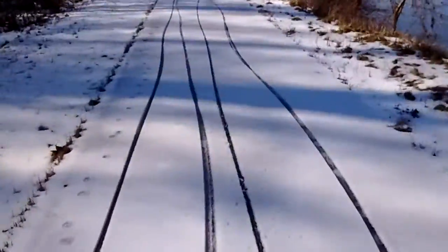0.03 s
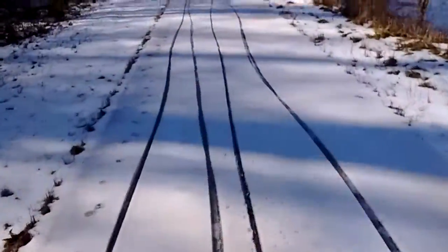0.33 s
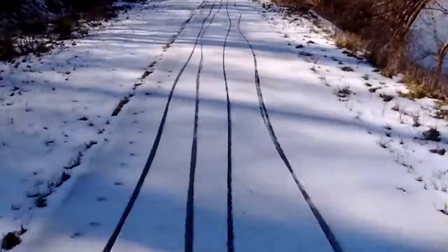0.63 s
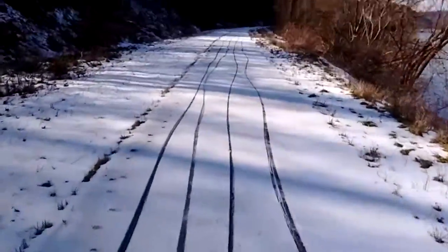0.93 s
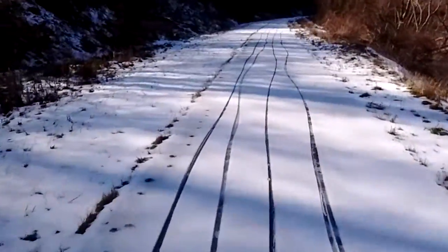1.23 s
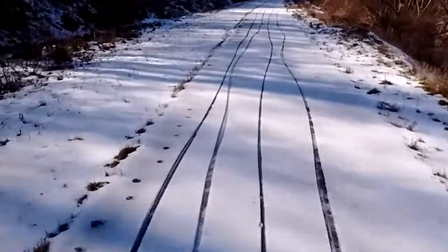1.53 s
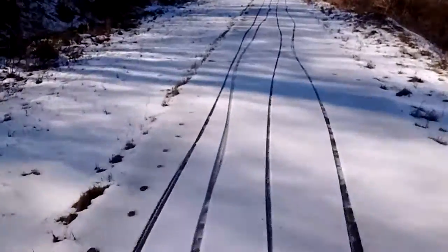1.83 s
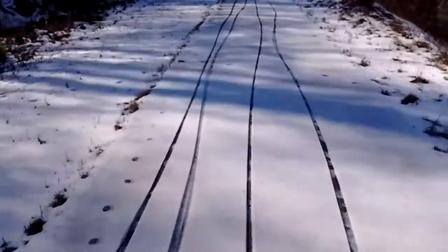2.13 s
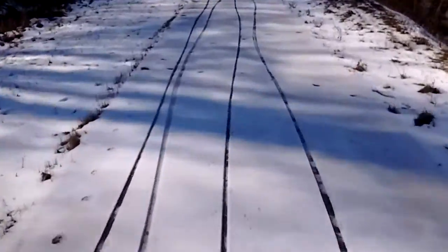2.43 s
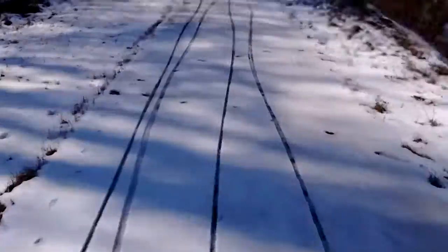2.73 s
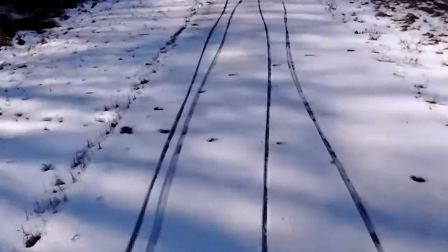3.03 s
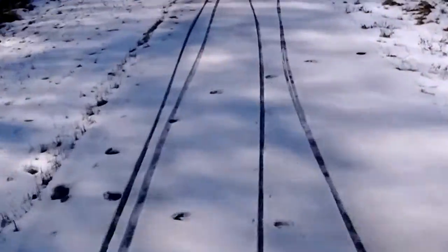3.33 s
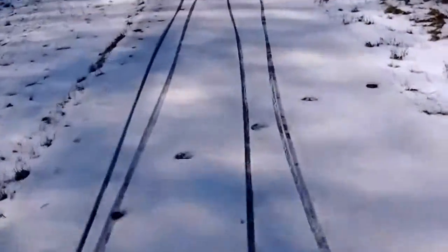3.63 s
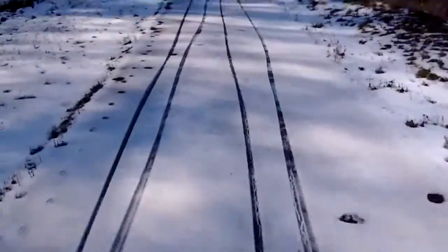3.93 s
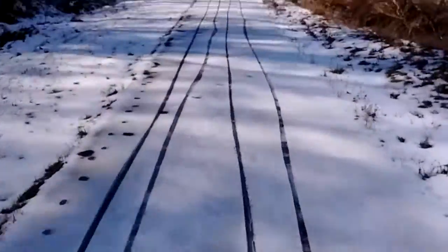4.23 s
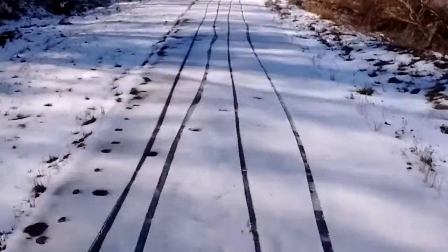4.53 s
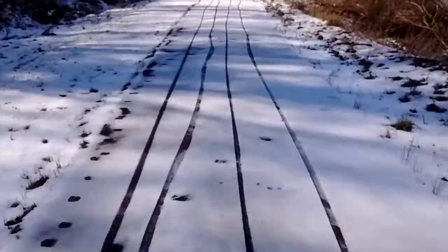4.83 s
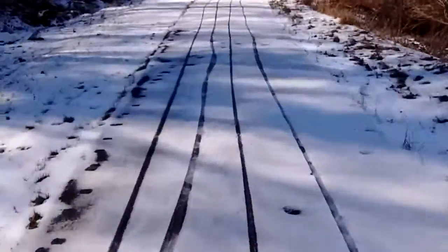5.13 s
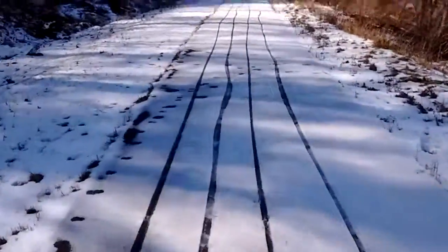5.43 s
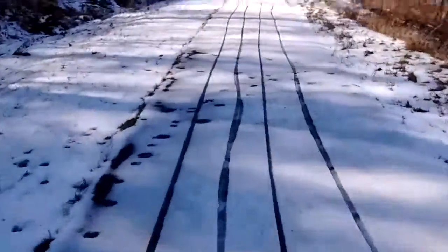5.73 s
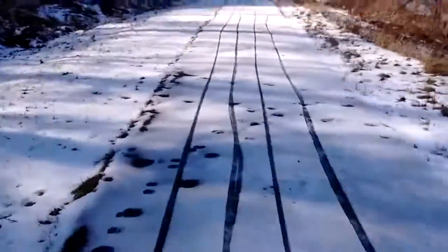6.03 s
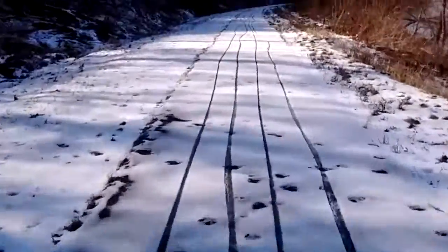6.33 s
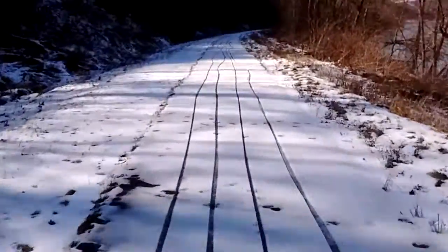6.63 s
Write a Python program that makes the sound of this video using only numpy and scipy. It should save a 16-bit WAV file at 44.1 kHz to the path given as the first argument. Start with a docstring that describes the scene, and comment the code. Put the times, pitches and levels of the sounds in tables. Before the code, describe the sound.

Bicycle tyres crunch steadily over thin, crusted snow, with small icy cracks, light rattles and low wind rumbling on the microphone.

```python
"""On a trail of thin, crusted snow, a bicycle rolls along with a camera fixed to it.
The tyres crush a steady stream of grains, break clumps and crack ice, most of all over a trodden
patch near the end. Each break is a tiny click, shaped by the snow or by the part it sets ringing.
The frame booms under the jolts, a loose part rattles, the tread hums,
and wind buffets the camera's two microphone openings (the ports)."""
import sys
import numpy as np
from scipy import signal
from scipy.fft import rfft, irfft
from scipy.io import wavfile

SR = 44100
rng = np.random.default_rng(int(sys.argv[2]) if len(sys.argv) > 2 else 0)


def digitize_waveform(pressure):
    """Quantize a signal to 16-bit integers and store it at the path in sys.argv[1].

    Rows of a 2-D input are taken as channels; values are limited to [-1, 1].
    """
    field = np.atleast_2d(pressure).T
    bounded = np.clip(field, -1, 1)
    quanta = np.round(bounded * 32767).astype(np.int16)
    wavfile.write(sys.argv[1], SR, quanta)


N = 299880
TIME = np.arange(N) / SR

# how loud the snow is along the trail: (time [s], crunch [dB], powder fizz [dB])
SNOW_LEVELS = [(0, -33.5, -52.5), (.25, -32.5, -50.5), (.49, -30, -43), (.62, -31.5, -45.5),
               (.88, -27.5, -42.5), (1.1, -30, -48), (1.4, -29.5, -45), (1.9, -27.5, -41),
               (2.35, -29.5, -41), (2.72, -28.5, -44), (3.0, -29, -47.5), (3.4, -28, -46.5),
               (4.15, -29, -43.5), (4.33, -31.5, -52.5), (4.8, -29, -43), (5.35, -29.5, -41),
               (5.65, -32.5, -45), (5.95, -25.5, -39.5), (6.4, -29.5, -45), (6.8, -25, -39.5)]
# the tone of crunching snow and of fizzing powder: (frequency [Hz], level [dB])
CRUNCH_TONE = [(150, -21), (400, 5.5), (530, 4), (660, -1), (860, 2), (1270, -6.5), (1500, -2), (2000, -2),
               (2450, -1), (3000, -4.5), (4000, -13), (5000, -19), (6200, -27.5), (12000, -45.5)]
FIZZ_TONE = [(2000, -11.5), (4500, 7.5), (6300, -3), (7300, 1), (8400, 2.5), (9500, 1), (11500, -4),
             (15000, -11)]
# the notes of the frame, damped by the tyres, and the loose part: (pitch [Hz], width [Hz], level [dB])
FRAME_NOTES = [(114.7, 14, -5.5), (223.3, 23, -3.5), (256, 46, 1.5), (327, 30, -6), (514.4, 36.5, -4.5)]
LOOSE_PART_NOTES = [(1360, 340, -25.5), (1890, 190, -17), (2040, 150, -9)]


def rolling():
    """Snow gives way unevenly, shaking frame and loose part in step; powder sprays in its own waves."""
    pressure_db = follow(SNOW_LEVELS, 1) + 1.5 * flutter(slow_hz=0.75, fast_hz=55)
    powder_db = follow(SNOW_LEVELS, 2) + 2 * flutter(slow_hz=2, fast_hz=23.8)
    crunch = colour(grains(per_s=9000, spread_db=2.5) * amp(pressure_db - 3.5), CRUNCH_TONE)
    fizz = colour(grains(per_s=20000, spread_db=-0.5) * amp(powder_db - 3.5), FIZZ_TONE)
    jolts = grains(per_s=2500, spread_db=1)
    sway_db = 3 * flutter(slow_hz=0.77, fast_hz=5.6)
    boom = ring(jolts * amp(pressure_db - 5 + sway_db), FRAME_NOTES)
    buzz = ring(grains(per_s=3000, spread_db=1) * amp(pressure_db - 16.5), LOOSE_PART_NOTES)
    return crunch + fizz + boom + buzz


# big clumps of snow under a tyre: (time [s], crunch [dB], length [s], thud [dB])
BIG_CLUMPS = [(.497, -30, 0.014, -47), (.766, -28.5, 0.01, -34), (.792, -25, 0.0086, -22),
              (1.016, -33, 0.011, -20), (1.395, -31, 0.028, -38), (1.552, -28.5, 0.012, -32),
              (2.026, -25.5, 0.0071, -41), (2.322, -27, 0.018, -29), (2.396, -28, 0.023, -35),
              (2.45, -29, 0.01, -29), (2.484, -26.5, 0.02, -40), (2.556, -29, 0.01, -30),
              (2.588, -28.5, 0.005, -21), (2.821, -28, 0.0098, -34), (2.89, -27.5, 0.0055, -22),
              (3.293, -28, 0.009, -43), (3.344, -22.5, 0.0037, -47), (3.469, -26.5, 0.0052, -22),
              (3.542, -30.5, .007, -36), (3.582, -27.5, 0.016, -29), (3.903, -24.5, 0.0078, -23),
              (3.922, -23.5, 0.0065, -31), (3.96, -24.5, 0.012, -29), (4.138, -29, 0.0039, -20.5),
              (4.348, -25, 0.0068, -28), (4.479, -29.5, 0.012, -23.5), (4.578, -26, 0.0052, -23.5),
              (4.762, -25, .0038, -37), (4.811, -28, 0.0078, -39), (4.845, -30, 0.027, -31),
              (5.476, -23.5, 0.01, -22), (5.508, -22.5, 0.0044, -23), (5.519, -25, 0.016, -27),
              (5.535, -18.5, 0.0072, -38), (5.582, -28, 0.0057, -31), (5.615, -32, .003, -36),
              (5.648, -23.5, 0.0067, -31), (5.696, -26, 0.0041, -29), (5.731, -24.5, 0.0093, -22.5),
              (5.752, -28, 0.011, -23), (5.797, -22, 0.0083, -38), (5.815, -18, 0.011, -15),
              (5.853, -21, 0.0093, -36), (5.876, -29, 0.0031, -34), (5.95, -23, 0.0028, -29),
              (5.959, -19, 0.0055, -37), (6.006, -20.5, 0.0043, -21), (6.029, -19.5, 0.011, -24),
              (6.094, -17.5, 0.0084, -22), (6.111, -24.5, 0.0092, -22), (6.143, -21.5, 0.0074, -41),
              (6.183, -26, 0.008, -37), (6.216, -23, 0.016, -25), (6.257, -24, 0.0083, -36),
              (6.270, -20, 0.0091, -34), (6.301, -20, 0.0069, -26), (6.34, -26.5, 0.016, -32),
              (6.437, -22.5, 0.012, -28), (6.494, -23, 0.005, -30), (6.532, -23, 0.015, -25),
              (6.676, -33, 0.0035, -22)]
# the low notes of a struck tyre: (pitch [Hz], width [Hz], level [dB])
TYRE_NOTES = [(520, 170, 7), (700, 130, 11), (994, 67, -29)]


def clumps(tyre_db=-8, spray_db=-20.5):
    """Each clump caves in with a volley of breaks, drums on tyre and frame, and throws a soft spray."""
    s, db, length, thud_db = np.vstack([BIG_CLUMPS, small_lumps()]).T
    stick_slip = unit(amp(1.8 * flutter(slow_hz=100, fast_hz=260)))  # the snow grips and lets go
    breaks = grains(per_s=6000, spread_db=3) * stick_slip * swells(s, db - 1, length, rise=0.45)
    crush = colour(breaks, CRUNCH_TONE)
    cloud = swells(s, db + spray_db, length * 0.98, rise=0.58)
    spray = colour(rng.standard_normal((2, N)) * cloud, FIZZ_TONE)
    jolts = grains(per_s=2800, spread_db=2.5) * stick_slip * swells(s, thud_db + 0.5, length, rise=0.45)
    thuds = ring(jolts, FRAME_NOTES) + amp(tyre_db) * ring(jolts, TYRE_NOTES)
    return crush + spray + crust_plates(s, db, length) + thuds


# small lumps under the tyres, loudest early on and faint near the end: (time [s], typical level [dB])
LUMP_LEVELS = [(0, -40.5), (1.7, -30), (2.6, -37), (4.7, -35), (5.1, -53), (5.65, -46), (6.1, -42),
               (6.8, -38)]


def small_lumps(spread_db=4, length_s=0.0061, thud_db=7, count=64):
    """One small lump lies somewhere in each stretch of trail; gives rows like those of BIG_CLUMPS."""
    place, size, span = rng.random((count, 3)).T
    s = (np.arange(count) + place) / count * N / SR
    db = np.interp(s, *np.transpose(LUMP_LEVELS)) + spread_db * (2 * size - 1)
    return np.transpose([s, db, length_s * (0.5 + span), db + thud_db])


def crust_plates(s, db, length, level_db=-11.5, low_hz=1350, high_hz=2450, width_hz=190, sizes=5):
    """Each clump's crust breaks into a plate of random size, which gives its crunch a faint pitch."""
    plate_size = rng.integers(0, sizes, len(s))
    breaks = grains(per_s=6000, spread_db=2.5)
    out = np.zeros((2, N))
    for size, hz in enumerate(np.geomspace(low_hz, high_hz, sizes)):
        chosen = plate_size == size
        bursts = swells(s[chosen], db[chosen] + level_db, length[chosen], rise=0.45)
        out += ring(breaks * bursts, [(hz, width_hz, 0)], size=1024)
    return out


# cracks in the icy crust: (time [s], level [dB], frame knock [dB], brightness [dB], tyre pitch [ratio])
CRUST_SNAPS = [(3.3423, -21, -22, 9, 0.9), (3.4627, -18, -29, 8.5, 1.3), (3.6564, -13.5, -24, 8, 1.6),
               (4.0946, -18, -19, 4, 1.3), (4.2328, -14.5, -18, 4, 1.34), (4.3436, -21, -27, 12, 1.05),
               (4.351, -27, -31, 16, 1.2), (4.3733, -11.5, -20, -4, 1.21), (4.4675, -15, -19, -2, 1.4),
               (4.7376, -14.5, -28, -6, 1.43), (4.7412, -9.5, -38, -6, 0.68), (4.762, -20, -24, 13, 1.06),
               (4.769, -16.5, -27, 7, 0.91), (4.851, -28.5, -19, 27.5, 1.27),
               (5.4755, -19.5, -34, 11, 1.36), (5.5143, -10.5, -26, -3, 1.4), (5.536, -22, -38, 12, 1),
               (5.5779, -21, -33, 16, 1.6), (5.586, -29.5, -39, 23, 1.3), (5.6135, -26, -38, 9, 1.5),
               (5.7519, -14.5, -24, -4, 1.3), (5.8105, -12, -28, 5, 0.96), (5.8418, -25, -21, 9, 0.89),
               (5.949, -24, -28, 18, 1.4), (6.003, -22, -28, 11, 1.06), (6.022, -21, -20, 6, 1.3),
               (6.056, -26, -25, 17, 1.2), (6.09, -31, -32, 11, 1.2), (6.203, -30, -23, 8, 1.9),
               (6.213, -15, -22, 0, 0.84), (6.2712, -23, -20, 13, 0.47), (6.322, -27, -32, 21, 1.38),
               (6.4345, -35, -22, 12, 2), (6.522, -28, -37, 7, 1.6), (6.527, -29, -31, 2, 1.2),
               (6.5405, -28, -30, 9, 1.3), (6.6763, -16, -39, -16, 1.7)]
# the high notes of the crust: (pitch [Hz], width [Hz], level [dB])
CRUST_NOTES = [(2290, 140, 36), (2780, 170, -32)]


def snaps(step_s=0.00089, base_pop_hz=1150, pop_db=-2.5, crumble_db=-7, crumble_s=0.0031, crumbs=4):
    """The crust cracks and crumbles; the tyre drops through with a dry pop and bounces back."""
    out, cracks, knocks = np.zeros((3, 2, N))
    chance = rng.random((len(CRUST_SNAPS), 2, crumbs))
    for (s, db, knock_db, bright_db, pitch), (delay, flip) in zip(CRUST_SNAPS, chance):
        tyre_gain, crust_gain, frame_gain = amp([db + 16, db + 5.5 + bright_db, knock_db + 27])
        crack, drop, bounce = (round((s + k * step_s / pitch) * SR) for k in (-1, 0, 1))
        cracks[0, crack] += crust_gain
        knocks[0, bounce] += frame_gain
        push = np.zeros((1, bounce - drop + 1))
        push[0, [0, -1]] = tyre_gain * np.array([0.7, -0.5])  # in, then back out
        # a sharper edge rings the tyre higher
        notes = [(hz * pitch, width * pitch, note_db) for hz, width, note_db in TYRE_NOTES]
        boing = ring(push, notes, size=2048)
        pop_hz = base_pop_hz * pitch
        pop = ring(np.full((1, 1), tyre_gain * amp(pop_db)), [(pop_hz, pop_hz, 0)], size=2048)
        for sound in (boing[0, :N - drop], pop[0, :N - drop]):
            out[0, drop:drop + len(sound)] += sound
        crumbs_at = np.round((s + crumble_s * delay) * SR).astype(int)
        cracks[0, crumbs_at] += crust_gain * amp(crumble_db) * np.sign(flip - 0.5)
    return out + ring(cracks, CRUST_NOTES) + ring(knocks, FRAME_NOTES)


# thin ice splintering: (time [s], level [dB])
ICE_SPLINTERS = [(5.476, -11), (5.5075, -18), (5.5155, -16), (5.5365, -17), (5.9495, -14), (6.085, -15),
                 (6.094, -20), (6.302, -10), (6.4345, -25), (6.606, -9), (6.6555, -13), (6.6675, -10),
                 (6.679, -18)]
# the bright tone of thin ice: (frequency [Hz], level [dB])
ICE_TONE = [(2000, -25), (4500, 11), (6400, -3), (8500, 6), (11500, -11), (15000, -17)]


def splinters(scatter_s=0.0023, chips_db=-8, chips=4):
    """Thin ice ticks once, and a few chips fly off just after."""
    clicks = np.zeros((2, N))
    chance = rng.random((len(ICE_SPLINTERS), 2, chips))
    for (s, db), (delay, flip) in zip(ICE_SPLINTERS, chance):
        chips_at = np.round((s + scatter_s * delay) * SR).astype(int)
        clicks[0, chips_at] += amp(db + chips_db) * np.sign(flip - 0.5)
        clicks[0, round(s * SR)] += amp(db)
    return colour(clicks, ICE_TONE)


# frozen ridges in the trail: (time [s], level [dB], length [s], pitch [Hz])
FROZEN_RIDGES = [(3.9026, -17.5, 0.0024, 844), (3.924, -26, .005, 925), (3.958, -19.5, 0.0016, 797),
                 (3.962, -27, 0.0012, 877), (4.136, -27, 0.0048, 840), (4.296, -27, 0.0018, 958),
                 (4.45, -24, 0.0037, 856), (6.22, -35, .004, 903)]


def ridges():
    """The tread slips over a hard edge and the tyre answers with a short, hollow creak."""
    out = np.zeros((2, N))
    slip = 1 + 0.059 * flutter(slow_hz=60, fast_hz=300)
    for s, db, length, hz in FROZEN_RIDGES:
        creak = unit(np.sin(2 * np.pi * np.cumsum(hz * slip) / SR))
        out[0] += creak * swells([s], [db], [length], rise=0.99)
    return out


# gritty patches of snow: (time [s], level [dB], length [s])
GRIT_PATCHES = [(1.596, -43, 0.044), (1.848, -39, 0.045), (2.067, -46, 0.073), (4.015, -43, 0.2),
                (5.18, -42.5, 0.9), (6.666, -38.5, 0.059)]
# the hissy notes of grit: (pitch [Hz], width [Hz], level [dB])
GRIT_NOTES = [(4070, 790, 17), (4600, 490, 6), (8000, 720, -7.5)]


def sizzles():
    """Coarse, dry crystals hiss under the tread."""
    s, db, length = np.transpose(GRIT_PATCHES)
    return ring(grains(per_s=7400, spread_db=3) * swells(s, db, length, rise=0.16), GRIT_NOTES)


# flurries of fine ice crystals: (time [s], level [dB], length [s])
ICE_FLURRIES = [(0.487, -49, 0.041), (2.29, -46, 0.056), (3.28, -51.5, 0.15), (5.497, -47, .025),
                (5.536, -35.5, 0.0046), (5.798, -49.5, .016), (6.618, -50, .012), (6.668, -46, 0.013),
                (6.79, -42, .015)]
# the tone of those crystals: (frequency [Hz], level [dB])
CRYSTAL_TONE = [(3000, -25), (6500, -2), (8500, 6), (11500, -2), (15000, -10)]


def flurries():
    """The tread throws up fine crystals, which scatter in a crisp, bright swish."""
    s, db, length = np.transpose(ICE_FLURRIES)
    return colour(grains(per_s=9000, spread_db=2) * swells(s, db, length, rise=0.35), CRYSTAL_TONE)


# shakes of the loose part: (time [s], chatter [dB], length [s], pitch [ratio], tick [dB])
LOOSE_PART_SHAKES = [(0.1365, -26.5, 0.008, 0.87, -15), (0.166, -32, 0.0056, 0.9, -30),
                     (0.8874, -33, 0.0055, 0.79, -7.5), (1.361, -36, .004, .9, -16),
                     (1.3795, -28, 0.0074, 0.87, -6.5), (1.403, -27.5, 0.014, 1.02, -9),
                     (2.209, -34, .003, 0.98, -12), (4.743, -27, 0.0032, 0.78, -26),
                     (4.846, -19.5, 0.01, 1.11, -22), (4.9205, -20.5, 0.0044, 0.99, -11),
                     (5.144, -24.5, 0.016, 1.1, -9.5), (6.319, -25, 0.0035, 0.87, -14)]


def rattles(tick_hz=1820, tick_width_hz=1100):
    """The loose part hits its stop with a dry tick and chatters; its notes shift with how it sits."""
    out, ticks = np.zeros((2, 2, N))
    chatter = grains(per_s=4200, spread_db=-10)[:1]
    for s, db, length, pitch, tick_db in LOOSE_PART_SHAKES:
        notes = [(hz * pitch, width, note_db) for hz, width, note_db in LOOSE_PART_NOTES]
        out[:1] += ring(chatter * swells([s], [db], [length]), notes, size=1024)
        ticks[0, round(s * SR)] = amp(tick_db + 5.5)
    return out + ring(ticks, [(tick_hz, tick_width_hz, 0)], size=1024)


# tread knobs on packed snow: (time [s], pitch [Hz], hum [dB], octave above [dB])
TREAD_HUM = [(0, 109, -65, -58), (.6, 110, -58, -45), (1.8, 109, -55, -50), (2.9, 109.5, -55, -43),
             (4.35, 109, -58, -49), (4.6, 109, -53, -38), (4.95, 108.7, -47, -35.5), (5.15, 109, -49, -39),
             (5.45, 109, -36, -38.5), (5.7, 109, -36.5, -47), (5.95, 108.5, -34.5, -48),
             (6.3, 108, -41, -50), (6.8, 107, -52, -50)]


def tread(waver_db=4, left_db=0.5, right_db=-1.5):
    """Knobs meet the hard track at an even rate: a wavering low hum and its octave."""
    speed = 1 + 0.007 * flutter(slow_hz=1.5, fast_hz=8)
    cycles = np.cumsum(follow(TREAD_HUM, 1) * speed) / SR
    hum = np.zeros(N)
    for harmonic in (1, 2):
        db = follow(TREAD_HUM, harmonic + 1) + waver_db * flutter(slow_hz=3.7, fast_hz=14)
        hum += unit(np.sin(2 * np.pi * harmonic * cycles)) * amp(db)
    # the low hum reaches both ports at once; the right port's wave is upside down
    return np.outer([amp(left_db), -amp(right_db)], hum)


# wind on the camera: (time [s], level [dB])
WIND_LEVELS = [(0, -37.5), (.5, -31), (1.05, -28), (1.35, -29), (1.6, -29), (2.05, -35), (2.55, -34),
               (2.9, -28), (3.04, -38.5), (3.7, -34), (4.15, -32.5), (4.5, -40.5), (5.1, -35.5),
               (5.3, -31.5), (5.55, -37), (5.95, -32.5), (6.45, -31), (6.8, -37.5)]
# its deep tone: (frequency [Hz], level [dB])
WIND_TONE = [(10, -48), (30, 0), (65, -5.5), (115, 1), (180, -0.5), (260, -14.5), (450, -22), (1500, -47)]


def wind():
    """Air buffets the camera with a low, lumpy rumble."""
    gusts = amp(follow(WIND_LEVELS, 1) + flutter(slow_hz=1.2, fast_hz=29.7))
    return colour(rng.standard_normal((2, N)) * gusts, WIND_TONE)


# swirls of air: (time [s], level [dB], length [s], pitch [Hz], port [0 left, 1 right])
AIR_PUFFS = [(0.949, -32, .012, 150, 0), (0.977, -27.5, 0.012, 131, 0), (1.031, -29.5, 0.016, 222, 1),
             (1.051, -28.5, 0.015, 114, 0), (1.092, -29, 0.011, 139, 0), (1.247, -28, 0.0085, 120, 1),
             (1.59, -35.5, 0.034, 106, 0), (1.716, -34.5, 0.018, 190, 0), (1.751, -28.5, 0.0071, 232, 1),
             (2.927, -32, 0.02, 84, 0), (4.035, -41, 0.052, 128, 1), (5.272, -37, 0.023, 111, 0),
             (6.403, -37.5, 0.071, 73.5, 1)]


def puffs(width_hz=75):
    """A swirl of air booms briefly on one port alone."""
    out = np.zeros((2, N))
    for s, db, length, hz, port in AIR_PUFFS:
        swirl = rng.standard_normal((1, N)) * swells([s], [db], [length])
        out[round(port)] += ring(swirl, [(hz, width_hz, 0)])[0]
    return out


# how sound reaches the ports at the camera's two ends: (frequency [Hz], share of the travel time
# [ratio], trail's left side over its right [dB], loss at the far port [dB], left port over right [dB])
PORT_PATHS = [(80, 0, -15, 6, -0.5), (322, 0, -25, -12.5, 0.93), (845, 0, -26.5, 18.5, 4),
              (1225, .5, -14.5, 15.5, 6.5), (1570, .9, -31, 29.5, -5.5), (2220, 1.1, 6.5, -4, 4),
              (3240, 1, -8.5, 4.5, 2), (4120, 1, 13.5, -2.5, -2.5), (5530, 1, -25, 22.5, 4),
              (6550, 1, -2, 1, 0.5), (9030, 1, 28, 22.5, 0), (10700, 1, 4, 31, 1), (14700, 1, 0, 72, 4.5)]


def ports(sides, travel_s=0.000312):
    """Bass reaches both ports at once through the mount; treble goes by air, later to the far port."""
    hz = np.fft.rfftfreq(N, 1 / SR)
    by_air, left_db, loss_db, lean_db = (across(PORT_PATHS, hz, column) for column in range(1, 5))
    left_gain, lean = amp(left_db), amp(lean_db)
    from_right, from_left = rfft(sides[0]), rfft(sides[1]) * left_gain
    far = amp(-loss_db) * np.exp(-2j * np.pi * hz * travel_s * by_air)
    # the mount rocks, moving the camera's ends against each other
    twist = np.exp(1j * np.pi * np.clip(1 - 2 * by_air, 0, 1))
    left = (far * from_right + from_left) / np.hypot(abs(far), left_gain)
    right = (from_right + far * twist * from_left) / np.hypot(1, abs(far) * left_gain)
    pair = np.array([left * lean, -right])  # the right port's wave is upside down
    return irfft(pair * np.sqrt(2 / (1 + lean ** 2)), N)


def amp(db):
    """Turns decibels into a gain."""
    return 10 ** (np.asarray(db) / 20)


def unit(x):
    """Scales a signal to an average power of 1."""
    return x / np.sqrt(np.mean(x ** 2) + 1e-20)


def follow(table, column):
    """Reads one column of a time table at every sample."""
    table = np.array(table)
    return np.interp(TIME, table[:, 0], table[:, column])


def across(table, hz, column=1):
    """Reads one column of a frequency table at the given frequencies."""
    table = np.array(table)
    return np.interp(np.log(hz + 1), np.log(table[:, 0] + 1), table[:, column])


def colour(x, tone, size=4096):
    """Gives a sound the tone in a table, while clicks keep their sharp starts."""
    hz = abs(np.fft.fftfreq(size, 1 / SR))
    log_gain = np.log(amp(across(tone, hz)))
    response = np.exp(np.conj(signal.hilbert(log_gain)))  # nothing sounds before the click
    taps = np.fft.ifft(response).real[:size // 2]
    return signal.oaconvolve(x, taps[None] / np.linalg.norm(taps), axes=1)[:, :N]


def ring(x, notes, size=8192):
    """Lets a sound ring an object's notes; the wider a note, the sooner it dies away."""
    t = np.arange(size) / SR
    taps = np.zeros(size)
    for hz, width, db in notes:
        note = amp(db) * width * np.exp(-np.pi * width * t) * np.cos(2 * np.pi * hz * t)
        within_octave = signal.butter(2, [hz / 2, hz * 2], "bandpass", fs=SR, output="sos")
        taps += signal.sosfilt(within_octave, note)
    return signal.oaconvolve(x, taps[None] / np.linalg.norm(taps), axes=1)[:, :N]


def flutter(slow_hz, fast_hz):
    """Random wavering, mostly between a slow and a fast rate."""
    hz = np.fft.rfftfreq(N, 1 / SR)
    shape = hz / (hz + slow_hz) / np.sqrt(hz + slow_hz) / (1 + (hz / fast_hz) ** 4)
    return unit(irfft(rfft(rng.standard_normal(N)) * shape, N))


def grains(per_s, spread_db):
    """Two separate streams of tiny random clicks; spread_db sets how much their sizes vary."""
    size = amp(spread_db * np.minimum(rng.exponential(1, (2, N)), 4))
    sign = rng.choice([-1, 1], (2, N))
    happens = rng.random((2, N)) < per_s / SR
    return unit(size * sign * happens)


def swells(times, levels_db, lengths, rise=0.38):
    """A gain curve of bursts that rise fast and fade more slowly; rise is a share of the length."""
    power = np.zeros(N)
    for s, db, length in zip(times, levels_db, lengths):
        near = slice(*np.searchsorted(TIME, [s - 2 * length, s + 6 * length]))
        age = (TIME[near] - s) / length + rise  # 0 at the peak
        power[near] += amp(db) ** 2 * np.exp(np.where(age < 0, -(age / rise) ** 2, -age))
    return np.sqrt(power)


def scene():
    """Everything travels with the bicycle, so each sound keeps its place at the ports."""
    snow = rolling() + sizzles() + flurries() + clumps() + snaps() + splinters() + ridges()
    sides = snow + rattles() + wind()  # row 0 is the right side of the trail, row 1 the left
    return ports(sides) + tread() + puffs()


def record(dry, cutoff_hz=15550):
    """The camera cuts off the highest treble."""
    taps = signal.firwin(801, cutoff_hz, window=("kaiser", 9), fs=SR)
    return signal.oaconvolve(dry, taps[None], "same", axes=1)


dry = scene()
out = record(dry)
digitize_waveform(out)
```